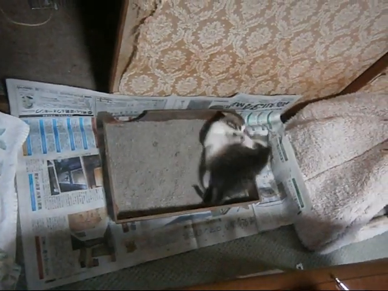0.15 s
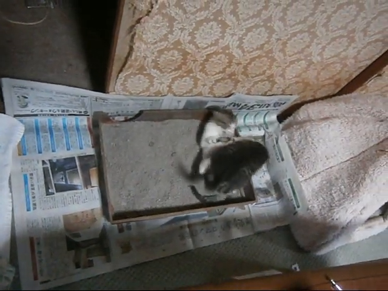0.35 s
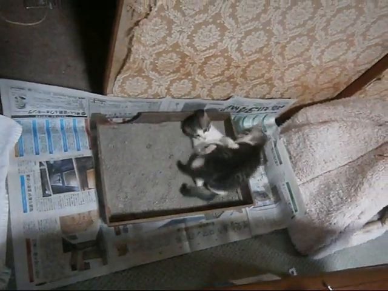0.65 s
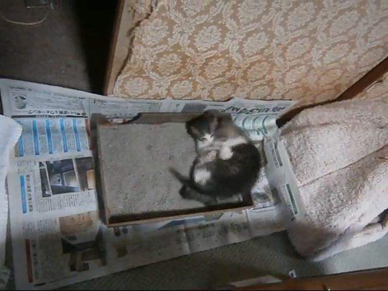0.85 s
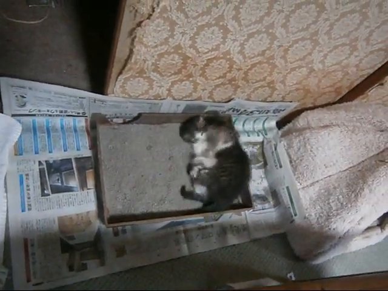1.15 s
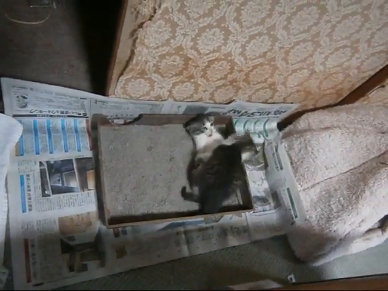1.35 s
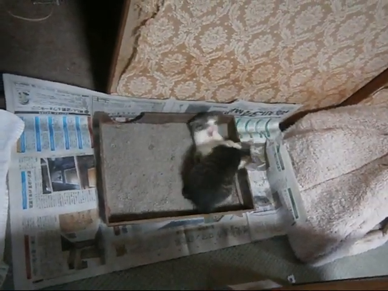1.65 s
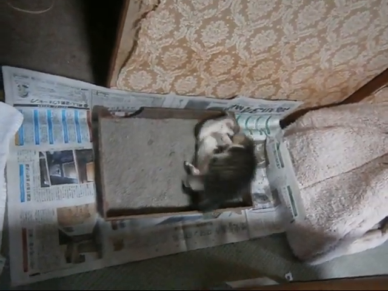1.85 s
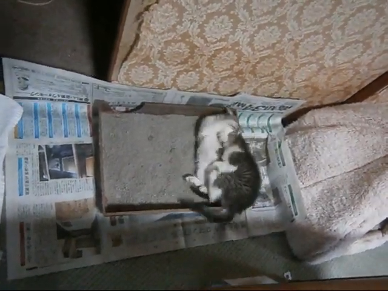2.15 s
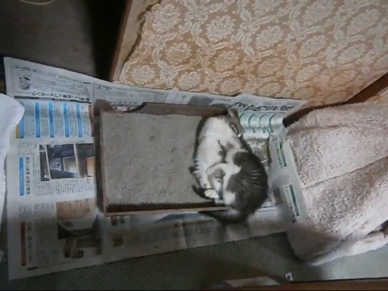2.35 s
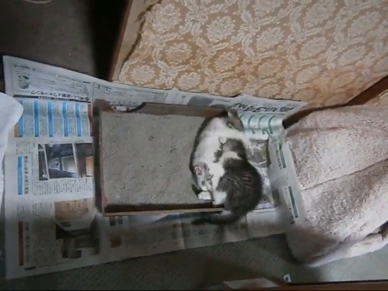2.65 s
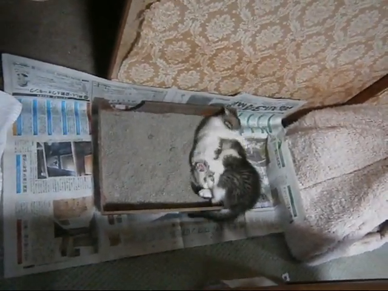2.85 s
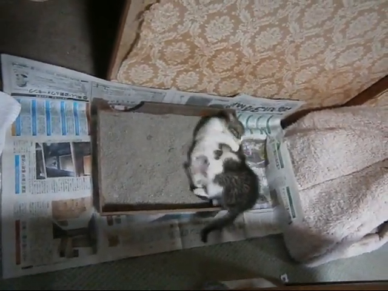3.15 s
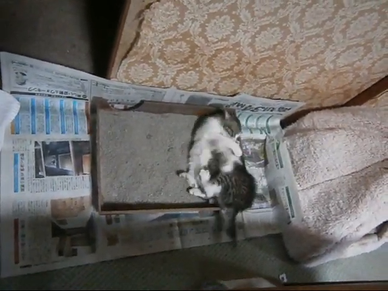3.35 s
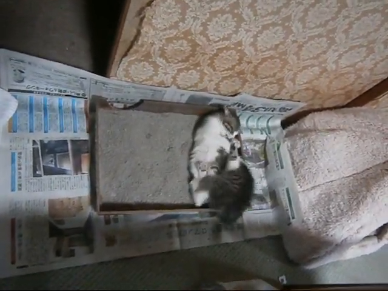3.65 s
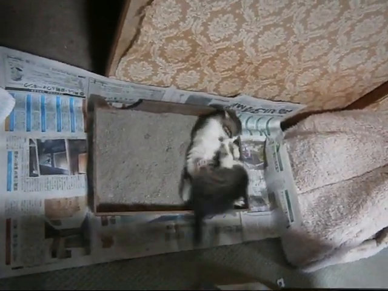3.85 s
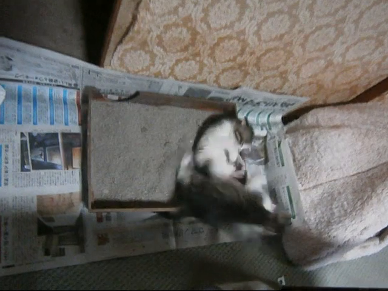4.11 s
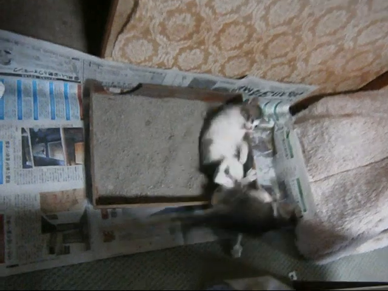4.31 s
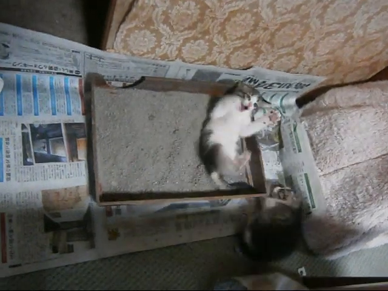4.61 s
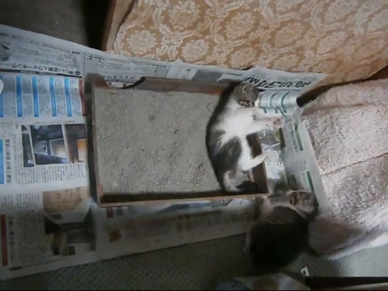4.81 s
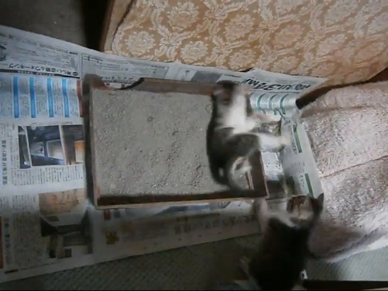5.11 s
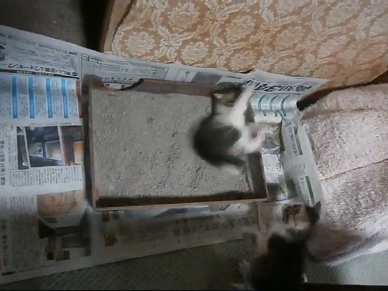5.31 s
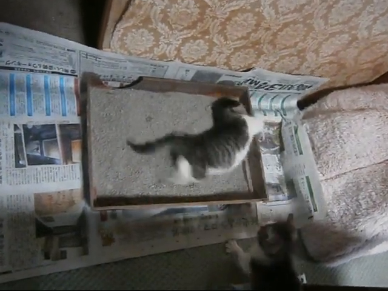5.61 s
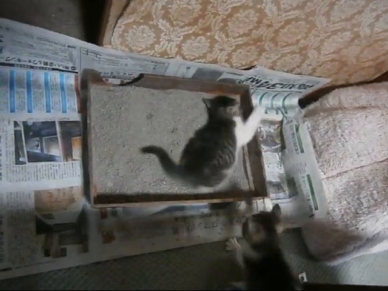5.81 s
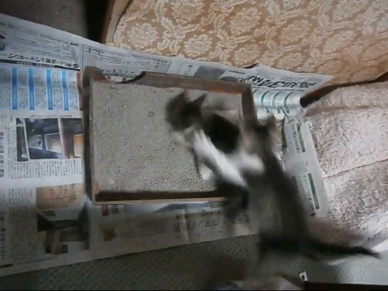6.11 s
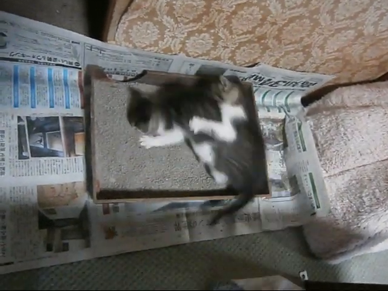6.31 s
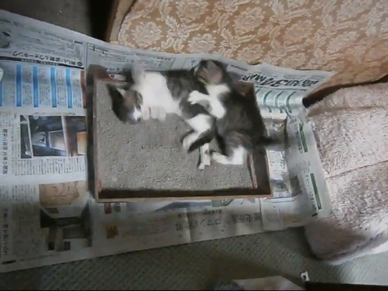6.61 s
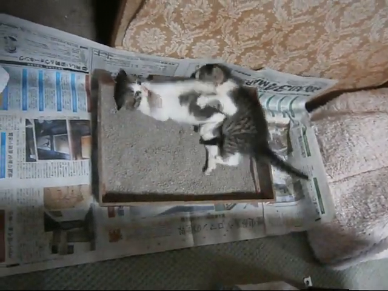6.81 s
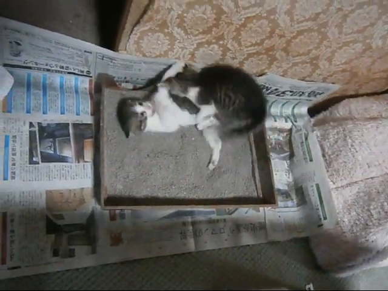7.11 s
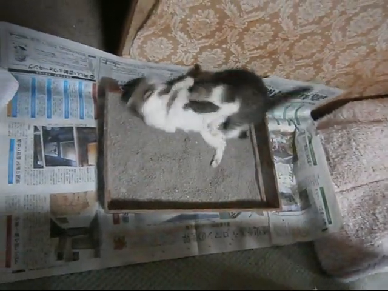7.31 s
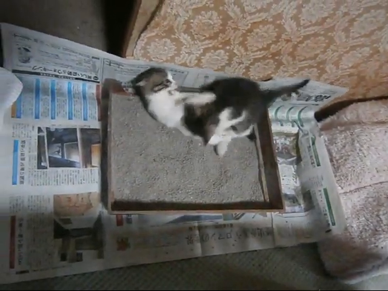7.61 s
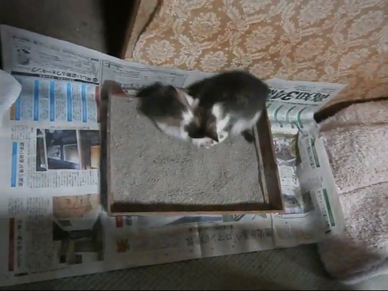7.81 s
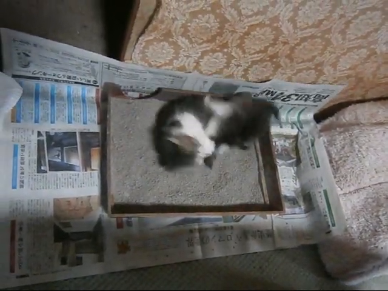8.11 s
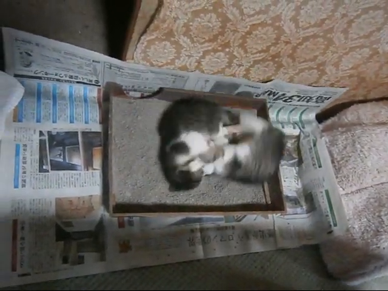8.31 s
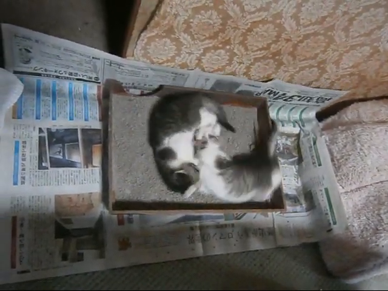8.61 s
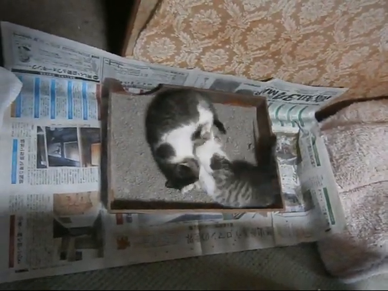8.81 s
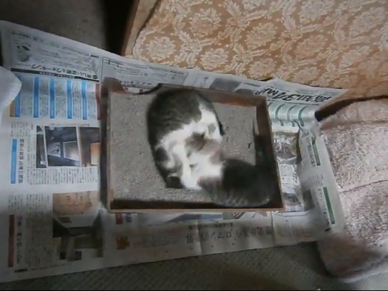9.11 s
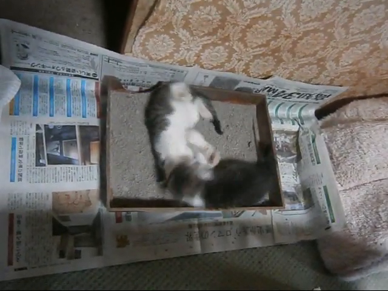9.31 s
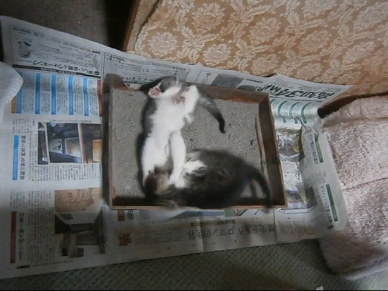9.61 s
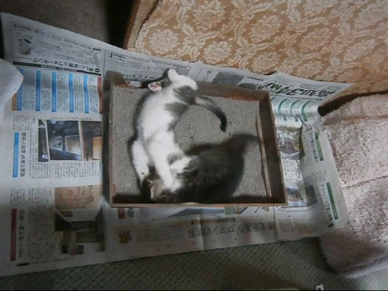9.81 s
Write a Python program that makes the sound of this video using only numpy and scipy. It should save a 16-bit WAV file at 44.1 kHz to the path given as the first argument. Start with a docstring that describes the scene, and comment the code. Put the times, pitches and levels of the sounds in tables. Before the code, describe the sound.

Soft shuffling and scattered claw clicks open as two young cats tussle in a litter tray, with one clear knock against it. Flurries of paws raking litter and snapping on newspaper follow, building to a heavy drop into the tray. The scuffle continues with lighter bumps, a faint wheeze and tiny high squeaks. The room is small with little echo, and microphone hiss and a thin whine run underneath.

```python
"""Sharp claw snaps and a soft rustle come first: two kittens wrestle on newspaper in a shallow tray
in a small soft room. Friction of fur and paws drives the tray floor; claws scatter litter and crackle
the paper in brief impulses. Bodies bump the rim and once drop heavily in, exciting the tray's damped
modes. A faint wheeze and thin squeaks come late. The camera adds hiss, a high whine and a small offset."""
import sys
import numpy as np
from scipy import signal
from scipy.fft import rfft, irfft, next_fast_len
from scipy.io import wavfile
from scipy.ndimage import map_coordinates

SR = 44100
rng = np.random.default_rng(int(sys.argv[2]) if len(sys.argv) > 2 else 0)


def unload_audio(sound):
    """Save the sound as a 16-bit wav file, at the path given as the first command line argument."""
    columns = np.transpose(np.atleast_2d(sound))
    # keep every value between -1 and 1, then stretch to whole-number steps
    steps = np.round(np.clip(columns, -1, 1) * 32767)
    wavfile.write(sys.argv[1], SR, steps.astype(np.int16))


N = 438794

# Noise spectra. Each row: frequency in Hz, relative spectral density in dB.
HISS_SPECTRUM = [(20, -9.5), (60, -5.5), (150, 0), (400, -2), (1000, -10.5), (2500, -17.5), (5500, -21.5),
                 (7000, -16.5), (8500, -22), (10300, -16.5), (11000, -16), (11700, -11), (12400, -22),
                 (16000, -25.5)]
WHEEZE_SPECTRUM = [(3300, -30), (3750, -11), (4050, 0.1), (4400, -4), (4900, -27)]
FUR_SPECTRUM = [(150, -43), (350, -8.5), (650, 0), (800, 0), (1070, 1), (1400, -7.5), (1850, -12),
                (2300, -12), (3300, -21), (4000, -42), (4700, -21), (7000, -45)]  # the tray floor rubbed by fur
GRIT_SPECTRUM = [(800, -5.5), (1900, -8.5), (2600, -3), (3200, -3.5), (4000, -2.5), (5700, -7.5),
                 (7200, -4), (9000, -5), (10500, -7), (11900, -8), (13500, -18), (15800, -26.5)]
RASP_SPECTRUM = [(300, -31), (750, -3.5), (950, 1.5), (1150, 4.5), (1450, 0.5), (1800, -23), (3000, -55)]  # the hollow tray under a paw
PAPER_SPECTRUM = [(3000, -70), (7000, -23), (8800, -2), (10400, -1.5), (12000, -5), (15800, -20)]
# Reverberation of the room. Each row: frequency in Hz, time to fall 60 dB in seconds.
ROOM_DECAY = [(100, 0.71), (1000, 0.23), (4000, 0.12), (12000, 0.12)]
# Air resonances between the tray's walls. Each row: centre in Hz, bandwidth in Hz, gain in dB.
AIR_MODES = [(1370, 220, -1), (2630, 310, -6), (3800, 147, 1), (5210, 105, 4), (7000, 360, -2),
             (10520, 790, -1)]
# Modes of tray and floor. Each row: frequency in Hz, level in dB, base time to fall 60 dB in seconds.
TRAY_MODES = [(80.5, -4, 0.21), (110, -5.5, 0.24), (165.3, 0, 0.16), (217, -5.5, 0.13), (274.4, 1, 0.14),
              (365.4, -3.5, 0.13), (449, 2.5, 0.056), (528, -5, 0.13), (646, -2, 0.084), (727, 1, 0.053),
              (859, 0.5, 0.077), (970, 0.5, 0.066), (1150, 4, 0.036), (1324, -7, 0.037), (1660, -37, 0.043)]
# Course of the wheeze. Each row: time in seconds, level in dB.
WHEEZE_LEVELS = [(0, -84), (6.7, -74), (6.9, -66), (7.251, -57), (7.7, -59), (7.85, -60), (8.3, -64.5),
                 (8.75, -57), (9.03, -78), (9.2, -55), (9.31, -65), (9.55, -52), (9.8, -68), (9.95, -60)]
# Thin squeaks. Each row: start in seconds, length in seconds, pitch in Hz, level in dB.
SQUEAK_NOTES = [(6.815, 0.13, 4250, -52), (7.17, .089, 4280, -52), (7.2, 0.11, 3890, -49),
                (7.54, .054, 4200, -52), (7.93, 0.066, 3960, -55), (8.69, 0.039, 4180, -73),
                (9.17, .086, 3880, -62), (9.35, 0.055, 4250, -51), (9.517, .04, 3820, -49)]
# Shuffling of the two bodies. Each row: time in seconds, fur level in dB, rustle level in dB.
SHUFFLE_LEVELS = [(0, -51, -56.5), (0.25, -58.5, -58), (0.5, -45.5, -47), (0.72, -57, -64.5),
                  (1.0, -53, -57.5), (1.6, -57, -61), (1.92, -51.5, -56), (2.8, -54.5, -61),
                  (3.6, -60, -56.5), (3.9, -43, -47), (4.33, -51, -56), (4.5, -35.5, -38.5),
                  (4.9, -56, -63.5), (5.1, -46.5, -47.5), (5.25, -47, -54.5), (5.7, -41.5, -50.5),
                  (6.4, -42.5, -48.5), (6.55, -31.5, -42), (6.82, -53, -56.5), (7.05, -43.5, -50.5),
                  (7.55, -42.5, -49.5), (8.05, -51, -56.5), (8.6, -43.5, -51), (8.9, -46, -55),
                  (9.05, -56, -57), (9.37, -53, -58), (9.57, -39, -52), (9.77, -55, -57.5),
                  (9.95, -43, -54)]
# Paws raking grit. Each row: start in seconds, length in seconds, level in dB, brightness in dB.
PAW_STROKES = [(0.365, .2, -41.5, -7), (0.534, 0.028, -41, 13), (.787, 0.11, -54.5, -8),
               (2.002, 0.054, -41.5, 1), (3.372, 0.065, -49, -2), (3.759, 0.01, -37.5, 8),
               (3.922, .081, -44, -3), (4.075, 0.063, -37.5, -4.5), (4.123, 0.047, -37.5, 5),
               (4.176, 0.034, -38.5, -5.5), (4.382, .037, -32.5, 1), (4.472, 0.047, -34.5, 1),
               (4.533, 0.032, -41.5, -11), (5.31, 0.094, -39, -4), (5.363, 0.061, -31, 4),
               (5.442, 0.016, -20.5, 11.5), (5.677, 0.03, -33, 9), (5.944, 0.045, -28, 7.5),
               (6.303, 0.067, -29.5, -2.5), (6.654, 0.016, -29.5, 7.5), (6.945, .06, -42.5, -8),
               (7.062, 0.05, -41.5, -0.5), (7.298, 0.03, -53, -11), (7.37, 0.044, -46, 5),
               (7.628, 0.023, -37, -2), (8.411, 0.018, -40, 7), (8.551, 0.043, -39.5, -5),
               (8.724, 0.18, -50.5, -10.5), (9.398, 0.091, -34.5, -5.5), (9.51, 0.069, -47, -8.5),
               (9.883, .06, -52, -9)]
# Clear claw and paper snaps. Each row: start in seconds, level in dB, ping frequency in Hz.
CLAW_SNAPS = [(0.076, -27, 7900), (0.159, -18, 3010), (0.2517, -29, 10300), (.289, -29.5, 3470),
              (0.516, -24, 6940), (1.7594, -15, 8700), (1.846, -17, 2260), (1.951, -30, 2010),
              (2.017, -25.5, 2500), (2.033, -21, 8400), (4.007, -29, 10700), (4.0824, -22, 2520),
              (4.132, -16, 8650), (4.182, -18.5, 2540), (4.391, -18, 6400), (4.4333, -16, 7000),
              (4.456, -9.5, 8700), (4.476, -14, 10300), (4.504, -11.5, 9600), (4.5228, -16, 6960),
              (4.5418, -10, 4400), (4.591, -22, 11500), (4.6344, -22, 9370), (4.692, -23.5, 6850),
              (4.7432, -21, 7100), (4.7905, -32, 8500), (4.8531, -20.5, 2780), (4.892, -29.5, 4800),
              (4.992, -23, 2820), (5.3956, -11.5, 10100), (5.4484, 0, 10600), (5.5684, -18.5, 4060),
              (5.598, -19.5, 7200), (5.69, -3.5, 9400), (5.7264, -18, 10700), (5.7456, -22, 8690),
              (5.758, -21.5, 2600), (5.8245, -32, 9150), (5.951, -5, 8800), (5.957, -2, 9280),
              (6.0008, -12.5, 10800), (6.0117, -11, 11300), (6.0196, -18, 11200), (6.1145, -27, 9600),
              (6.1458, -23.5, 7100), (6.2942, -13, 2020), (6.6072, -18.5, 2940), (6.655, -5, 10100),
              (6.695, -17, 10200), (6.8247, -28, 9800), (6.9066, -26, 3160), (6.936, -25, 3500),
              (6.9544, -14, 6700), (7.1114, -22, 3570), (7.1282, -19.5, 8400), (7.387, -24, 8700),
              (7.9586, -30, 3970), (7.9805, -27, 9400), (8.1528, -10, 10100), (8.1618, -22, 10200),
              (8.1666, -16.5, 10600), (8.2225, -26, 9150), (8.2552, -23.5, 10900), (8.3, -26, 10600),
              (8.3134, -24, 10700), (8.3243, -21, 11500), (8.3474, -27, 10500), (8.5096, -26, 9500),
              (8.5269, -27.5, 2650), (8.711, -20, 10100), (8.747, -24, 9900), (8.9198, -24, 2910),
              (9.7338, -32, 10600)]
# Coarse grit in a snap. Each row: ping frequency in Hz, share of the spray's power in dB.
COARSE_SHARE = [(2500, -0.66), (7000, -5), (9300, -14.5), (11000, -15)]
# Paper in a snap. Each row: ping frequency in Hz, share of the remaining power from 0 to 1.
PAPER_SHARE = [(8500, 0.09), (10500, 0.78)]
# Bodies striking the tray. Each row: start in seconds, level in dB, most strongly driven pitch in Hz,
# drive of the deep modes in dB, factor on the decay times.
BODY_BUMPS = [(.649, -31.5, 456, -12, 0.36), (.953, -29.5, 950, -22, .3), (1.283, -23.5, 527, -11.5, 0.41),
              (1.8427, -7, 806, -19, 0.25), (1.854, -7, 590, -18, 0.26), (1.865, -35, 795, -28, 0.31),
              (2.034, -19, 725, -20.5, 0.39), (4.083, -26, 1120, -14, 0.36),
              (4.225, -28.5, 128, -20, 0.086), (4.487, -18, 690, -28, 0.43), (4.578, -25, 133, -34, 0.088),
              (5.574, -25.5, 730, -24, 0.45), (6.294, -7, 750, -11.5, 0.33), (6.4784, -1.5, 480, -9, 0.32),
              (6.483, -5, 614, 0, 1.16), (6.61, -16, 760, -10, 0.28), (6.908, -21.5, 1080, -15, 0.27),
              (7.404, -33, 410, -9, 0.23), (7.519, -24.5, 930, -14, 0.47), (8.589, -14.5, 1110, -21, 0.66),
              (8.92, -23.5, 870, -28, 0.21)]


def amp(db):
    """Amplitude grows tenfold for every 20 dB."""
    return 10 ** (np.asarray(db) / 20)


def along(points, hz):
    """Interpolation of (Hz, value) points on a logarithmic frequency axis."""
    knots_hz, values = np.transpose(points)
    return np.interp(np.log(hz + 1), np.log(knots_hz + 1), values)


def wobble(rate):
    """Smooth random modulation: a spline through `rate` Gaussian knots a second."""
    return map_coordinates(rng.standard_normal(int(N * rate / SR) + 4), [np.arange(N) * rate / SR])


def coloured(x, spectrum):
    """A minimum-phase filter imposes a spectrum causally; white noise keeps its power."""
    size = 8192
    gain = amp(along(spectrum, np.fft.rfftfreq(size, 1 / SR)))
    cepstrum = irfft(np.log(gain + 1e-6))
    cepstrum[1:size // 2] *= 2
    cepstrum[size // 2 + 1:] = 0
    pulse = irfft(np.exp(rfft(cepstrum)))
    return signal.fftconvolve(x, pulse / np.linalg.norm(pulse))[:len(x)]


def grains(spread_db, clump_db, clump_rate):
    """Granular noise of unit power: dense tiny contacts come in clumps, a few far above the rest."""
    sizes = amp(spread_db * rng.exponential(size=N) + clump_db * wobble(clump_rate))
    contacts = sizes * rng.standard_normal(N)
    return contacts / np.sqrt(np.mean(contacts ** 2) + 1e-20)


def grit(coarse, fine):
    """Grain size sets the band: coarse contacts sound mainly under 5 kHz, fine ones above."""
    low = [(200, -39.5)] + [row for row in GRIT_SPECTRUM if row[0] < 5000] + [(6500, -26)]
    high = [(1000, -80), (3500, -20)] + [row for row in GRIT_SPECTRUM if row[0] > 5000]
    return coloured(coarse, low) + coloured(fine, high)


def contours(table):
    """Linear interpolation in time gives each level column one value in dB per sample."""
    times, *columns = np.transpose(table)
    return [np.interp(np.arange(N) / SR, times, db) for db in columns]


def room(x):
    """Reverberation decays faster in the treble; each quarter second has a new pattern of echoes."""
    out, hop, delay_samples = np.zeros(N + 2 * SR), SR // 4, 130
    for start in range(0, N, hop):
        hz, t, noise = signal.stft(rng.standard_normal(SR // 2), SR, nperseg=256)
        decay = amp(-60 * t / along(ROOM_DECAY, hz)[:, None])
        tail = signal.istft(noise * decay, SR, nperseg=256)[1]
        wet = signal.fftconvolve(x[start:start + hop], tail / np.linalg.norm(tail))
        out[start + delay_samples:][:len(wet)] += wet
    return out[:N]


def tray_cavity(direct):
    """Cavity resonance: the air in the tray adds a brief ring to the direct sound."""
    rings = sum(amp(db) * signal.lfilter(*signal.iirpeak(hz, hz / width_hz, SR), direct)
                for hz, width_hz, db in AIR_MODES)
    return amp(-2.5) * (direct + rings)


def wheeze():
    """Narrow-band noise near 4 kHz comes and goes by amplitude modulation."""
    level_db = contours(WHEEZE_LEVELS)[0] + 4.3 * wobble(11)
    band = [(20, -90)] + WHEEZE_SPECTRUM + [(16000, -90)]
    return amp(level_db) * coloured(rng.standard_normal(N), band)


def squeaks():
    """Faint tones near 4 kHz waver by random modulation of frequency and amplitude."""
    out = np.zeros(N)
    jitter_hz = 18 * wobble(120) + 12 * wobble(7.3)
    for start, length, hz, db in SQUEAK_NOTES:
        arch = np.sin(np.linspace(0, np.pi, round(length * SR)))
        phase = 2 * np.pi * np.cumsum(hz + jitter_hz[round(start * SR):][:len(arch)]) / SR
        out[round(start * SR):][:len(arch)] += amp(db + 0.5) * arch ** 0.19 * np.sin(phase)
    return out * amp(1.5 * wobble(40))


def rubbing(crackle, trickle_db=-22, trickle_s=0.027):
    """Friction of fur drives the tray floor; grit and paper rustle, and litter trickles after a crackle."""
    fur_db, rustle_db = contours(SHUFFLE_LEVELS)
    pole = np.exp(-1 / (trickle_s * SR))
    trickle = amp(trickle_db) * np.sqrt(signal.lfilter([1 - pole], [1, -pole], crackle ** 2))
    coarse = amp(rustle_db + 2.1 * wobble(8.3)) + trickle
    fine = amp(rustle_db + 1.5 * wobble(7)) + trickle
    rustle = grains(spread_db=2.5, clump_db=2.5, clump_rate=150)
    drag = amp(fur_db + 1.05 * wobble(6))
    fur = drag * coloured(grains(spread_db=2, clump_db=3.5, clump_rate=46), FUR_SPECTRUM)
    return fur + grit(coarse * rustle, fine * rustle)


def ticks(slot_s=0.01, base_per_s=14, above_rustle_db=13, spread_db=3.5):
    """A random point process gives rows of small snaps, denser and louder as the rustle grows."""
    timing, chance, size, pitch = rng.random((int(N / SR / slot_s), 4)).T
    starts = (np.arange(len(timing)) + timing) * slot_s
    rustle_db = contours(SHUFFLE_LEVELS)[1][(starts * SR).astype(int)]
    occurs = chance < base_per_s * slot_s * amp(rustle_db + 50)  # base rate at a -50 dB rustle
    db = rustle_db + above_rustle_db - spread_db * np.log(size + 0.039)
    ping_hz = 2500 * 3.4 ** pitch
    return list(zip(starts[occurs], db[occurs], ping_hz[occurs]))


def paw_strokes():
    """Scraping friction: a paw rakes grit; a duller stroke presses deeper and sounds the tray more."""
    envelopes = np.zeros((3, N + SR))
    for start, length, db, bright_db in PAW_STROKES:
        swell = np.abs(np.sin(np.linspace(0, np.pi, round(length * SR)))) ** 0.7
        hollow_db = -4.5 - 1.22 * bright_db
        gains = amp(db + np.array([hollow_db, 0, bright_db]))
        envelopes[:, round(start * SR):][:, :len(swell)] += gains[:, None] * swell
    hollow, coarse, fine = envelopes[:, :N] * grains(spread_db=3, clump_db=3, clump_rate=250)
    return coloured(hollow, RASP_SPECTRUM) + grit(coarse, fine)


def claw_snaps(ping_cycles=43):
    """Impulsive excitation: a damped ping and a spray of grit or paper noise, longer when stronger."""
    t = np.arange(SR // 8) / SR
    sprays, pings = np.zeros((3, N + SR)), np.zeros(N + SR)
    for start, db, hz in CLAW_SNAPS + ticks():
        rise_s, t60 = 0.00022 + 0.00084 * amp(db), 0.011 + 0.0046 * amp(db)
        rise = 1 - np.exp(-t / rise_s)
        envelope = amp(db - 2.5 - 60 * t / t60) * rise
        # Low pings are claws on coarse grit, high ones paper.
        coarse_share = min(amp(2 * along(COARSE_SHARE, hz)), 1)
        paper_share = np.clip(along(PAPER_SHARE, hz), 0, 1)
        rest = 1 - coarse_share
        gains = np.sqrt([coarse_share, rest * (1 - paper_share), rest * paper_share])
        sprays[:, round(start * SR):][:, :len(t)] += gains[:, None] * envelope
        ping_db = db - 5.5 - 60 * t * hz / ping_cycles
        pings[round(start * SR):][:len(t)] += amp(ping_db) * rise * np.sin(2 * np.pi * hz * t)
    coarse, fine, paper = sprays[:, :N] * rng.standard_normal((3, N))
    return grit(coarse, fine) + coloured(paper, PAPER_SPECTRUM) + pings[:N]


def body_bumps():
    """Modal vibration: a blow rings the tray near its own pitch; a heavy one drives deep modes too."""
    out, t = np.zeros(N + SR), np.arange(SR // 2) / SR
    hz, mode_db, t60 = np.transpose(TRAY_MODES)[:, :, None]
    for start, db, pitch_hz, deep_db, stretch in BODY_BUMPS:
        scatter = rng.standard_normal((len(TRAY_MODES), 2))
        near_drive = np.exp(-(np.log(hz / pitch_hz) / 0.37) ** 2)
        deep_drive = amp(deep_db * np.where(hz < 120, 2, 1)) * (hz < 400)  # the floor lies under 120 Hz
        rise = (1 - np.exp(-t * pitch_hz * 1.5)) ** 2
        tones = np.sin(2 * np.pi * hz * (1 + 0.027 * scatter[:, :1]) * t)
        decays = amp(mode_db + 2 * scatter[:, 1:] - 60 * t / (t60 * max(stretch, 0.1)))
        ring = rise * np.sum((near_drive + deep_drive) * decays * tones, axis=0)
        ring *= 1 + 1.5 * np.exp(-t * pitch_hz / 2.5)  # the blow itself stands above the ringing
        out[round(start * SR):][:len(t)] += amp(db) * ring / np.abs(ring).max()
    return out[:N]


def scene():
    """Superposition of all sources in one channel; knocks and crackle also excite the room."""
    knocks = body_bumps()
    crackle = tray_cavity(claw_snaps() + paw_strokes())
    echoes = room(amp(-9.5) * knocks + amp(-8) * crackle)
    return (knocks + crackle + echoes + rubbing(crackle) + squeaks() + wheeze())[None]


def record(dry):
    """Transduction: the camera cuts deep bass, adds hiss, whine and offset, saturates and band-limits."""
    hiss_db, whine_db, whine_hz, top_hz, offset = -46.5, -52, 14946.8, 15800, -0.0097
    hiss = amp(hiss_db + 0.25 * wobble(1.92)) * coloured(rng.standard_normal(N), HISS_SPECTRUM)
    whine = amp(whine_db + 0.5 * wobble(5)) * np.sin(2 * np.pi * whine_hz * np.arange(N) / SR)
    heard = signal.sosfilt(signal.butter(4, 66, "high", fs=SR, output="sos"), dry)
    mix = heard + hiss + whine
    limited = mix / (1 + np.abs(mix / 0.9) ** 6) ** (1 / 6)
    size = next_fast_len(N + 8192)
    passband = np.fft.rfftfreq(size, 1 / SR) < top_hz
    return irfft(rfft(limited, size) * passband, size)[:, :N] + offset


dry = scene()
out = record(dry)
unload_audio(out)
```